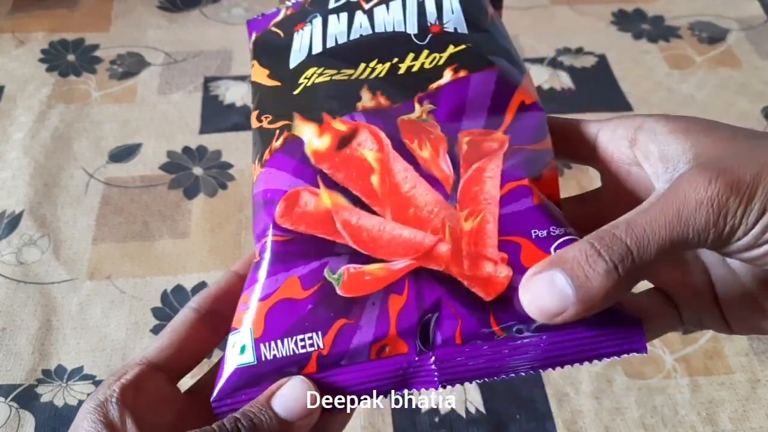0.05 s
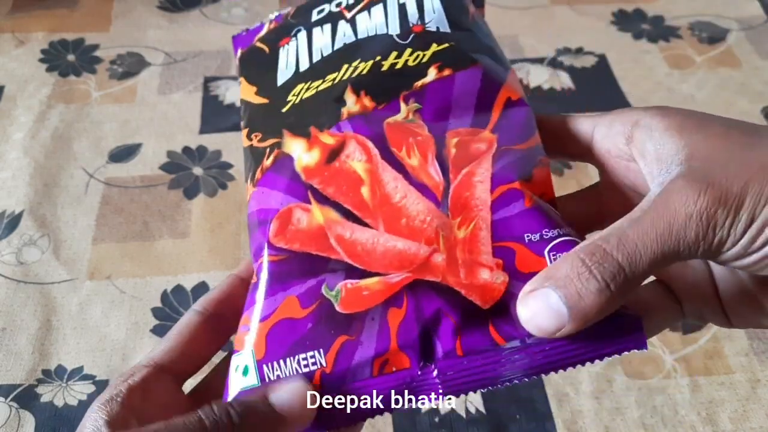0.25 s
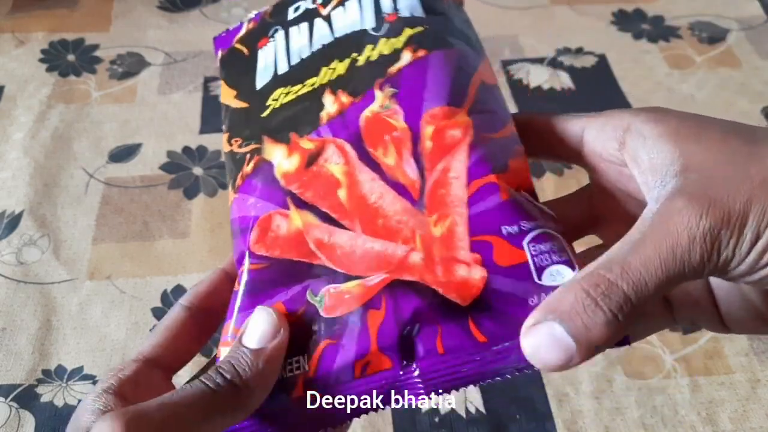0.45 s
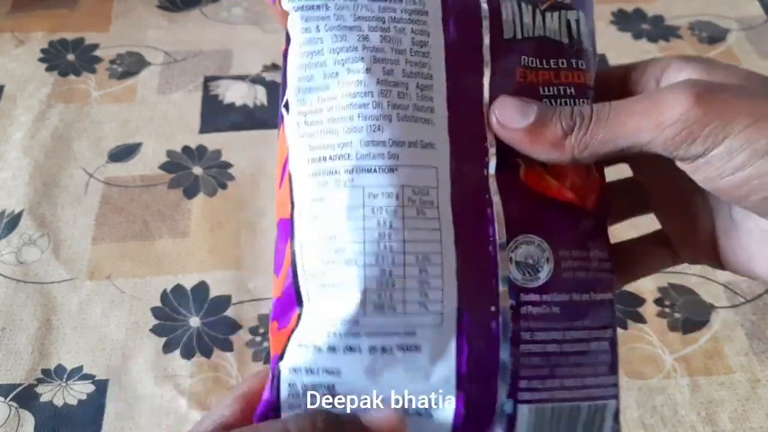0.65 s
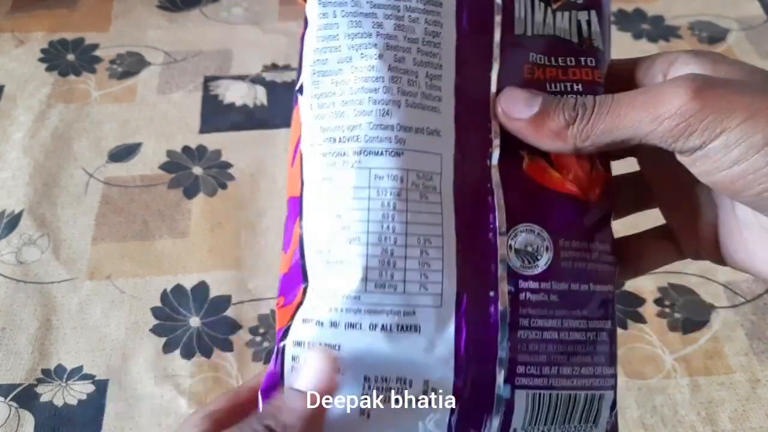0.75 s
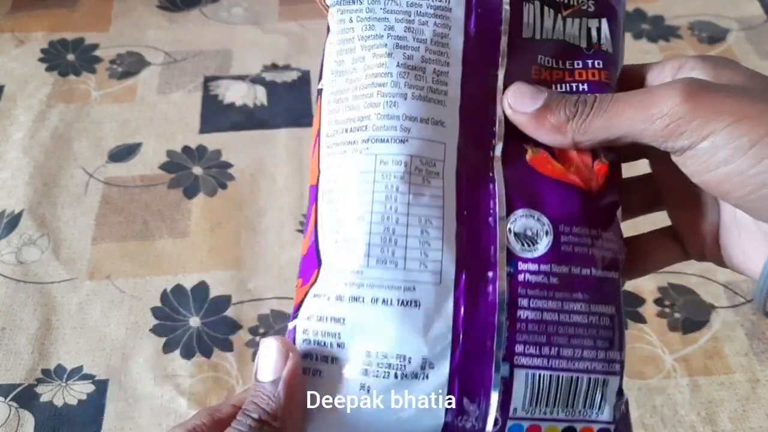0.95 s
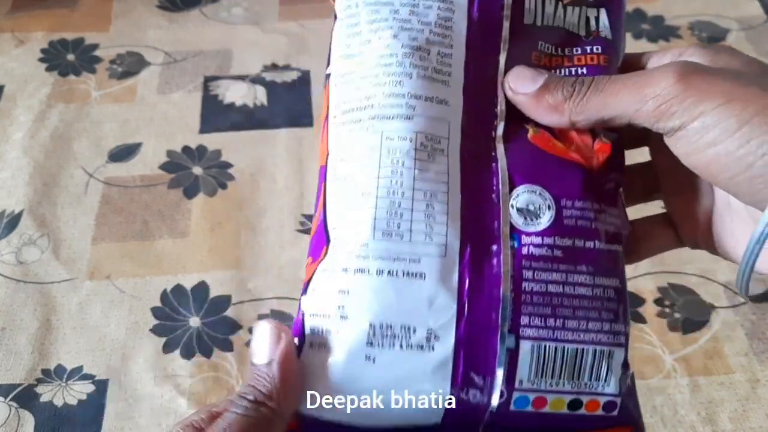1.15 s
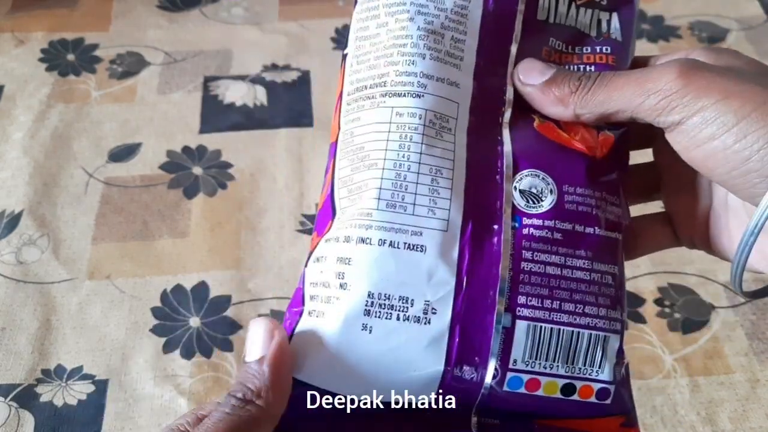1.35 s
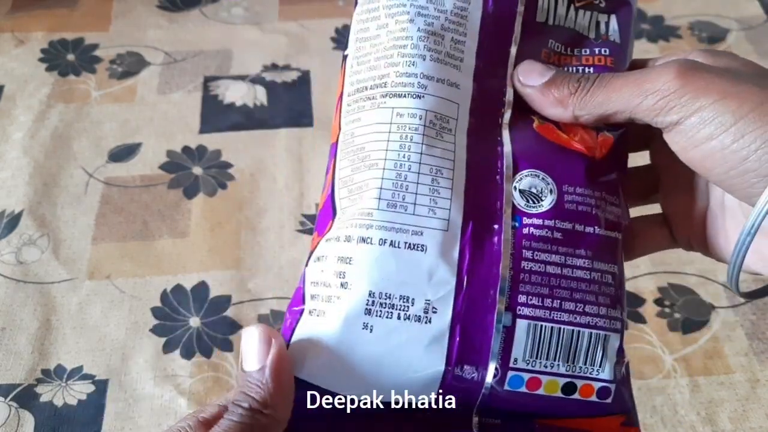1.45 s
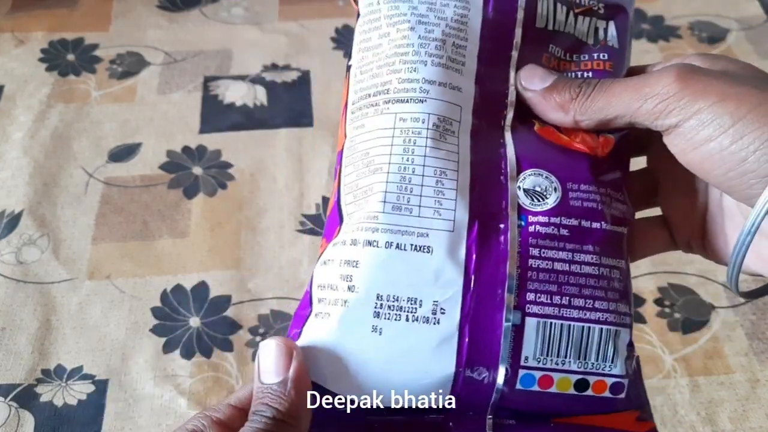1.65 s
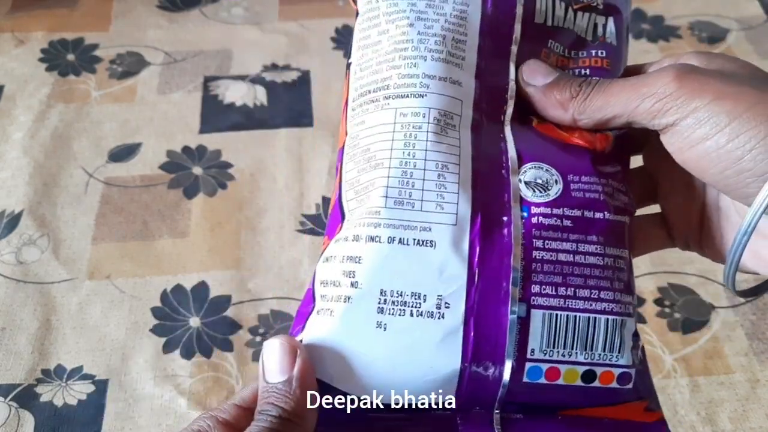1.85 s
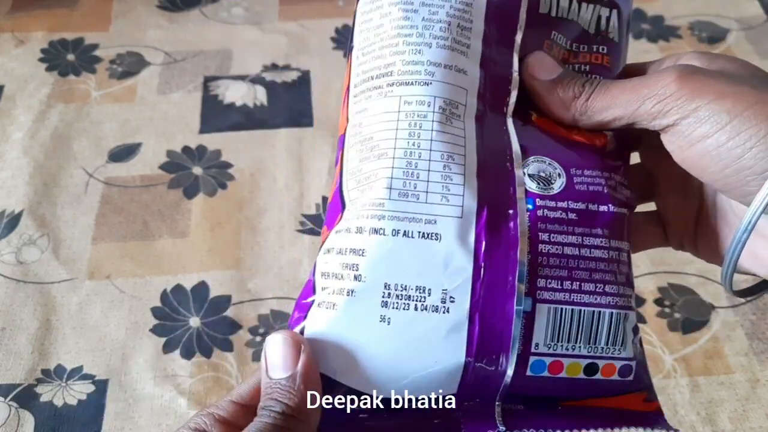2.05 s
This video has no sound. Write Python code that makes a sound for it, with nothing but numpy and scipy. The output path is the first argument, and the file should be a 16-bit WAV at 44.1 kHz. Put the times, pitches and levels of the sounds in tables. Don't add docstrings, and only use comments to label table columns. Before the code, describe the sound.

A foil snack bag crackles sharply and pops as two hands turn it over close by

```python
import sys
import numpy as np
from scipy import signal
from scipy.fft import rfft, irfft
from scipy.io import wavfile
from scipy.ndimage import uniform_filter1d

SR = 44100
rng = np.random.default_rng(int(sys.argv[2]) if len(sys.argv) > 2 else 0)


def file_out(sig):
    cols = np.atleast_2d(sig).T
    lim = np.clip(cols, -1, 1)
    pcm = np.round(lim * 32767).astype(np.int16)
    wavfile.write(sys.argv[1], SR, pcm)


def ratio(d):
    e = np.asarray(d, float) / 20
    return 10 ** e


N = 92610

# start_s [s], panel_db [peak dB], panel_hz [Hz], crack_db [peak dB], crack_hz [Hz]
SNAPS = [(0.2061, -25, 2110, -25.5, 4500), (0.2331, -19, 2230, -13, 4350),
         (0.3127, -32, 1600, -34.5, 4500.0), (0.3533, -16.5, 2130, -13, 4800.0),
         (0.4027, -20.5, 1925, -15, 4170), (0.4817, -21, 1760, -23.5, 5400),
         (0.531, -29.5, 1360, -10, 9300.0), (0.5976, -14, 2010, -19.5, 5140),
         (0.6225, -17.5, 1820, -15.5, 4450), (0.6557, -28.5, 580, -26, 13000.0),
         (0.6592, -16, 824, -18, 4660), (0.6717, -42, 840, -25, 6620), (0.7683, -32.5, 1110, -2, 7400),
         (1.0063, -15.5, 935, -4.5, 3900), (1.0484, -17, 1314, -15.5, 5380),
         (1.062, -21.5, 1300, -21, 4700.0), (1.2304, -5.5, 1214, -4.5, 3600),
         (1.2448, -26.5, 877, -21, 8000.0), (1.6439, -23, 1310, -15.5, 5340),
         (1.6507, -17.5, 1100, -26.5, 5200.0), (1.6764, -26, 1226, -15, 6800.0),
         (1.9209, -51.5, 1250, -53.5, 5340)]
# [s, dB,
# Hz, dB, Hz]
MORE_SNAPS = [(0.0235, -34, 820, -63, 3000), (0.185, -42.5, 370, -62, 3000), (0.2335, -31.5, 580, -28, 7000),
              (0.252, -34, 380, -50, 3000), (0.295, -42, 820, -55, 3000), (0.338, -38, 330, -36, 4540),
              (0.3536, -14.5, 820, -31, 2430), (0.3545, -31, 330, -22, 12000), (0.4032, -28, 510, -31, 11800),
              (0.517, -53, 680, -63, 2950), (0.5315, -26.5, 830, -25.5, 3470), (0.543, -37.5, 300, -49, 3500),
              (0.5995, -24, 960, -23, 5500), (0.6145, -25.5, 1500, -30.5, 3460), (0.635, -28.5, 700, -33, 3560),
              (0.677, -31.5, 900, -38.5, 3000), (0.7706, -22.5, 1400, -11.5, 4260), (0.804, -27, 800, -42, 4030),
              (1.0435, -48, 900, -28.5, 8000), (1.072, -30.5, 1000, -39, 3000), (1.078, -34.5, 2700, -41, 2700),
              (1.097, -37.5, 1000, -45, 3000), (1.254, -32, 900, -38.5, 4000), (1.268, -36, 830, -41.5, 4000),
              (1.3815, -55, 1500, -51, 3590), (1.6512, -39, 600, -36, 10860), (1.699, -40, 900, -48, 8000),
              (0.342, -46, 1510, -34, 4000), (0.3495, -26.5, 1550, -43, 3000), (0.7683, -27.5, 895, -19, 8600),
              (1.2312, -38, 2200, -26, 3000), (1.549, -53.5, 345, -73, 2980), (1.048, -42, 890, -17, 12000),
              (1.0615, -31, 880, -31, 13000), (1.958, -51, 1700, -57, 6500), (1.9655, -58.5, 1300, -70.5, 6500),
              (1.981, -58.5, 1900, -74.5, 3000), (1.996, -58, 1200, -67, 6000), (2.025, -64, 1800, -66, 6000),
              (2.040, -58, 1300, -68, 6000), (0.056, -46, 800, -74, 3000), (1.6445, -26, 2000, -30, 9000)]
# start_s [s], level_db [peak dB], pitch_hz [Hz], crack_db [peak dB]
POPS = [(0.0247, -30, 1120, -41.5), (0.1139, -42.5, 1920, -55), (0.1369, -41.5, 820, -63),
        (0.1625, -47, 354, -70), (0.2568, -36.5, 600, -43), (0.3465, -27.0, 1080, -37.5),
        (0.409, -33.5, 277, -35), (0.4484, -32, 727, -41), (0.4826, -25.5, 363, -36.5),
        (0.5566, -39, 393, -27), (0.5922, -26.5, 414, -32.5), (0.6108, -31, 730.0, -33),
        (0.6268, -17, 1180, -27.5), (0.629, -18, 530.0, -28), (0.6473, -15.5, 1420, -36),
        (0.6656, -22, 1300, -29), (0.7111, -27.5, 416, -43.5), (0.7367, -30, 510.0, -51),
        (0.77, -11.5, 864, -18), (0.9593, -42, 680, -47), (0.9904, -27.0, 386, -35.5),
        (1.0226, -27, 1156, -33.5), (1.0267, -28.5, 880, -36.5), (1.0634, -26, 440, -25.5),
        (1.0903, -29.5, 820, -32.5), (1.1759, -30, 660, -60), (1.2215, -31.5, 920, -37),
        (1.627, -32, 595, -74)]
# start_s [s], level_db [peak dB], pitch_hz [Hz], crack_db [peak dB]
SETTLING_POPS = [
    (1.5509, -53, 557, -74.5),
    (1.8436, -43.5, 1465, -66),
    (1.925, -50.5, 1260, -71),
    (1.971, -53, 1520, -46),
    (1.9856, -49.5, 1240, -71),
    (2.0192, -43, 1460, -61),
    (2.0298, -48.5, 1540, -57),
    (2.0584, -47, 1300, -68.0),
]
# start_s [s], level_db [peak dB], pitch_hz [Hz], crack_db [peak dB]
GIVE = (1.2268, -33.5, 1296.5, -59.5)
# start_s [s], level_db [peak dB], pitch_hz [Hz]
TICKS = [
    (1.5077, -53, 7150),
    (1.5587, -51.5, 6670),
    (1.5834, -81, 6300),
    (1.6132, -56, 5250),
    (2.0643, -45, 7360),
]
# start_s [s], level_db [peak dB], pitch_hz [Hz]
THUDS = [(0.025, -49.5, 178), (0.135, -46, 124), (0.246, -43, 115), (0.408, -65, 250), (0.548, -36, 176),
         (0.608, -38, 277), (0.649, -27, 274.5), (0.649, -32, 135), (0.798, -42, 201), (0.859, -47, 150),
         (0.349, -35, 237), (1.548, -58, 118.5), (1.007, -30, 205), (1.241, -41, 204.7),
         (1.638, -46.5, 214)]
# time_s [s], level_db [dB]
EFFORT = [(0, -58.5), (.1, -61), (.26, -60.5), (.45, -50.5), (.62, -40.5), (.75, -50), (.9, -61),
          (1.04, -57), (1.2, -63.5), (1.402, -82), (1.6, -73), (1.678, -42), (1.8, -89), (1.941, -77),
          (2.001, -64), (2.1, -66)]
# freq_hz [Hz], density_db [dB per Hz]
RUSTLE_COLOUR = [(80, -9), (200, -2), (400, 0), (1000, -12), (2000, -15), (4000, -20.5)]
# time_s [s], level_db [dB]
HUM = [(0, -87), (0.501, -78), (.62, -56), (.75, -68), (.9, -62.5), (1.05, -60), (1.2, -87.5),
       (1.482, -56.5), (1.799, -76), (2.05, -59)]
# freq_hz [Hz], level_db [dB]
HISS_COLOUR = [(18, -40), (30, 4), (86, 17), (161, 7), (684, -24.5), (1540, 2.5), (2410, -14), (7270, -2),
               (16000, -35.5)]
# freq_hz [Hz], t60_s [s]
ROOM_T60 = [(100, 0.29), (260, 0.34), (700, 0.35), (1840, .34), (4850, 0.31), (12800, 0.34)]
# freq_hz [Hz], level_db [dB]
ROOM_COLOUR = [(80, -3), (250, 3.5), (800, -1), (2000, 4), (5000, -2), (9000, -3), (15000, -6.5)]
# freq_hz [Hz], likeness [0 to 1]
LIKENESS = [(60, 0.32), (290, 0.77), (640, 0.22), (1410, 0.31), (15000, 0.014)]
# freq_hz [Hz], left_over_right_db [dB]
PORTS = [(60, -1.5), (1000, -.5), (3000, -0.5), (6000, -4.5), (8000, 5.5), (10000, 2), (15000, 10)]

PANEL_CYCLES, PANEL_T60_S, SIDE_PANEL_DB, KICK_DB = 47, 0.042, -9.5, 10
BAG_HZ, BAG_DB, BAG_T60_S = 1020, 4, 0.0081
RIP_S, FIRST_SLIP = 0.003, 4.16
CRACK_T60_S, CRACK_HISS_DB, CRACK_TOP_DB, CRACK_LOW_HZ = 0.011, -12.5, -1, 1710
AIR_DB, EARLIER_DB = -30.5, -21
RUSTLE_PER_S, RUSTLE_DB, RUSTLE_CYCLES = 2200, -1, 6
FIZZ_PER_S, FIZZ_DB = 20000, -9
THUD_CYCLES, THUD_RISE_S = 8.2, 0.0043
HISS_DB, HUM_HZ, HUM_WIDTH_HZ = -72, 65, 6
ROOM_DB, ROOM_ONSET_S = -10, 0.0011
PORT_LAG_S, SHELL_DIP_HZ, SHELL_DIP_DB = 0.0001, 9300, -5
GAP_S, GAP_LENGTH_S, GAP_DB = 0.5103, 0.0040, -24
RUMBLE_CUT_HZ, CEILING, CUTOFF_HZ = 77, 1.1, 17100


def at_hz(points, hz):
    table = np.array(points)
    return np.interp(np.log(hz), np.log(table[:, 0]), table[:, 1])


def over_time(points):
    s, db = np.transpose(points)
    return np.interp(np.arange(N) / SR, s, db)


def rms_one(x):
    return x / np.sqrt(np.mean(x ** 2) + 1e-20)


def peak_one(x):
    return x / np.abs(x).max()


def butter(x, order, hz, kind="low"):
    return signal.sosfilt(signal.butter(order, hz, kind, fs=SR, output="sos"), x)


def ring(clicks, hz, t60):
    r = ratio(-60 / (t60 * SR))
    w = 2 * np.pi * min(hz, 18000) / SR
    return signal.lfilter([0, np.sin(w)], [1, -2 * r * np.cos(w), r * r], clicks + 1e-18)


def bands(spectrum, size, t60s=None):
    out, t = 0, np.arange(size) / SR
    edges = 28 * 2 ** np.arange(0, 9.6, 0.5)
    white = rng.standard_normal((2, 2, size))
    for k, (low, high) in enumerate(zip(edges, edges[1:])):
        mid, side = butter(white[k % 2], 2, [low, high], "band")
        hz = np.sqrt(low * high)
        alike = np.clip(at_hz(LIKENESS, hz), 0, 1)
        fall_db = 60 * t / at_hz(t60s, hz) if t60s else 0
        stereo = np.sqrt(1 + alike) * mid + np.sqrt(1 - alike) * side * [[1], [-1]]
        out = out + ratio(at_hz(spectrum, hz) - fall_db) * stereo
    return out


def background():
    t60 = 1.0 / HUM_WIDTH_HZ
    hum = rms_one(ring(ring(rng.standard_normal(N), HUM_HZ, t60), HUM_HZ, t60))
    hiss = rms_one(bands(HISS_COLOUR, N))
    return ratio(HISS_DB) * hiss + ratio(over_time(HUM)) * hum


def rustle():
    sizes = ratio(4.04 * np.minimum(rng.exponential(1, N), 4)) * rng.choice([-1, 1], N)
    born = rng.random(N) < RUSTLE_PER_S / SR
    dealt = rng.integers(0, 24, N)
    rings = 0
    for k, hz in enumerate(np.geomspace(90, 3200, 24)):
        push = ring(sizes * born * (dealt == k), hz, 5.5 / hz)
        soft = ring(push, hz, RUSTLE_CYCLES / hz)
        rings = rings + ratio(at_hz(RUSTLE_COLOUR, hz)) * np.sqrt(hz) * rms_one(soft)
    specks = np.sign(sizes) * (rng.random(N) < FIZZ_PER_S / SR)
    fizz = ratio(FIZZ_DB) * rms_one(ring(specks, 6800, 0.00054))
    return ratio(over_time(EFFORT) + RUSTLE_DB) * (rms_one(rings) + fizz)


def snap(panel_db, panel_hz, crack_db, crack_hz, chance):
    t = np.arange(2048) / SR
    slips = chance * np.exp(-t / RIP_S) * (np.abs(np.roll(chance, 1)) > 1.9)
    slips[0] = FIRST_SLIP
    hiss = ratio(CRACK_HISS_DB - 60 * t / CRACK_T60_S) * chance[::-1]
    hiss[0] = -1

    push = butter([slips, t == 0], 1, [panel_hz * 0.5, panel_hz * 8.0], "band")
    push = butter(push, 1, min(panel_hz * 3, 18000))
    t60 = min(PANEL_CYCLES / panel_hz, PANEL_T60_S)
    main = ring(push[0], panel_hz, t60)
    sides = ring(push[0], panel_hz * 0.692, t60) - ring(push[0], panel_hz * 1.54, t60 * 0.77)
    kick = ratio(KICK_DB) * ring(push[0], panel_hz, 5.9 / panel_hz)
    bag = ratio(BAG_DB) * ring(push[0], BAG_HZ, BAG_T60_S)
    panel = ratio(panel_db) * peak_one(main + ratio(SIDE_PANEL_DB) * sides + kick + bag)

    hiss = butter([hiss, t == 0], 2, CRACK_LOW_HZ, "high")
    broad = butter(hiss, 2, min(crack_hz * 1.395, 18000)) + ratio(AIR_DB) * hiss
    top = peak_one(ring(hiss[0], crack_hz, 3.6 / crack_hz))
    crack = ratio(crack_db) * peak_one(peak_one(broad[0]) + ratio(CRACK_TOP_DB) * top)

    even_panel = np.std(panel) * rms_one(ring(push[1], panel_hz, t60 * 0.037))
    even_crack = np.std(crack) * rms_one(broad[1])
    return panel + crack, even_panel + even_crack


def creases():
    rows = list(SNAPS)
    rows += [(*row, 3500) for row in [*POPS, *SETTLING_POPS, GIVE]]
    rows += [(s + 0.0016, db - 9.5, 1500, db, hz) for s, db, hz in TICKS]
    rows += list(MORE_SNAPS)
    out = np.zeros((3, N + 4096))
    chance = rng.standard_normal((100, 2048))
    for (s, *colour), luck in zip(rows, chance):
        sound, even = snap(*colour, luck)
        start = int(s * SR)
        lag = int(PORT_LAG_S * SR * np.clip(luck[-1], -2, 2))
        out[0, start + lag:start + lag + 2048] += sound
        out[1, start:start + 2048] += sound
        out[2, start:start + 2048] += even
    out[2, :2] += ratio(EARLIER_DB) * np.array([1, -1])
    return out[:2, :N], out[2, :N]


def thuds():
    out, t = np.zeros(N + 8192), np.arange(8192) / SR
    for s, db, hz in THUDS:
        swell = 1 - np.exp(-t / THUD_RISE_S)
        shape = swell * ratio(-60 * t * hz / THUD_CYCLES) * np.sin(2 * np.pi * hz * t)
        start = int(s * SR)
        out[start:start + 8192] += ratio(db) * peak_one(shape)
    return out[:N]


def room(x):
    size = SR // 2
    onset = 1 - np.exp(-(np.arange(size) / SR / ROOM_ONSET_S) ** 2)
    tail = bands(ROOM_COLOUR, size, ROOM_T60) * onset
    tail /= np.sqrt(np.sum(tail ** 2) / 2)
    return ratio(ROOM_DB) * signal.fftconvolve(tail, x[None], axes=1)[:, :N]


def scene():
    near, sent = creases()
    soft = rustle() + thuds()
    return near + soft + room(sent + soft) + background()


def top_cut(x):
    return signal.sosfilt(signal.butter(12, 17170, fs=SR, output="sos"), x)


def record(dry):
    hz = np.arange(N // 2 + 1) * SR / N + 1
    dip_db = SHELL_DIP_DB * np.exp(-((hz - SHELL_DIP_HZ) / 1000) ** 2)
    port_db = at_hz(PORTS, hz) / 2 * np.array([[1], [-1]])
    x = irfft(rfft(dry) * ratio(port_db + dip_db), N)
    gap = np.abs(np.arange(N) / SR - GAP_S - GAP_LENGTH_S / 2) < GAP_LENGTH_S / 2
    x = x * uniform_filter1d(np.where(gap, ratio(GAP_DB), 1.0), size=20)
    x = butter(x, 2, RUMBLE_CUT_HZ, "high")
    x = CEILING * np.tanh(x / CEILING)
    x = signal.sosfilt(signal.cheby2(10, 60, CUTOFF_HZ, fs=SR, output="sos"), x)
    return top_cut(x)


dry = scene()
out = record(dry)
file_out(out)
```